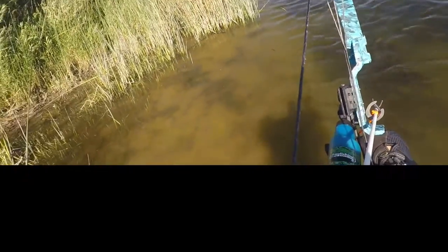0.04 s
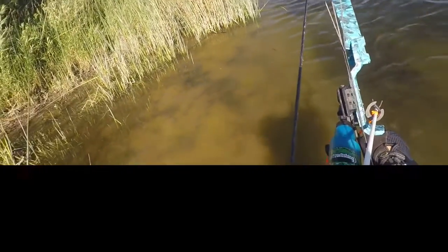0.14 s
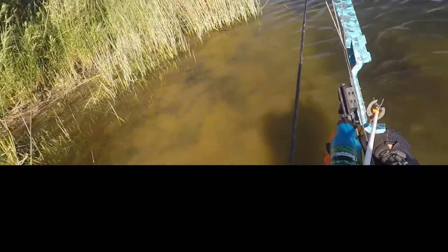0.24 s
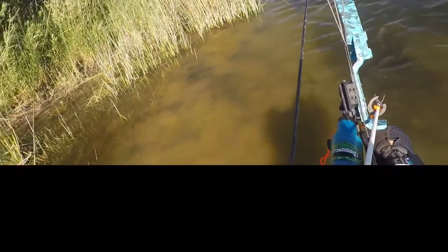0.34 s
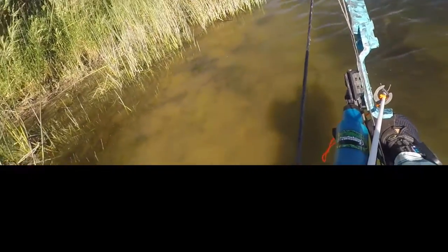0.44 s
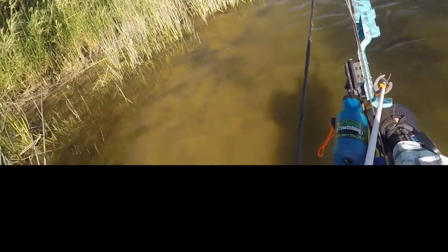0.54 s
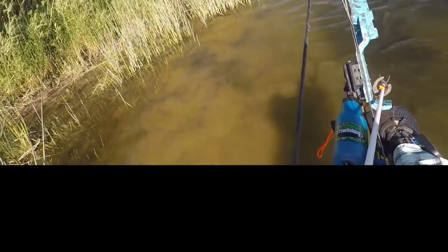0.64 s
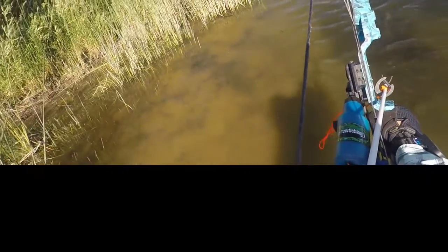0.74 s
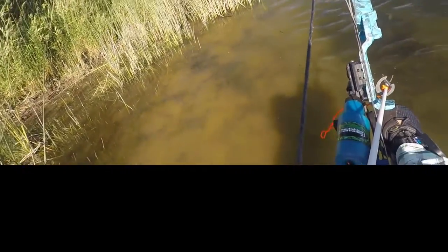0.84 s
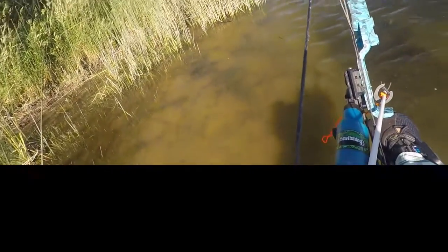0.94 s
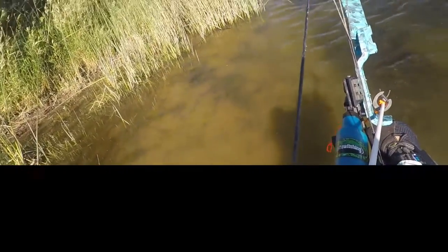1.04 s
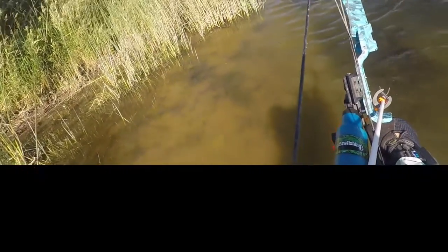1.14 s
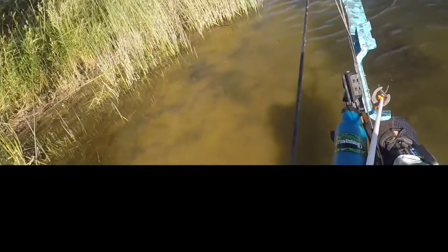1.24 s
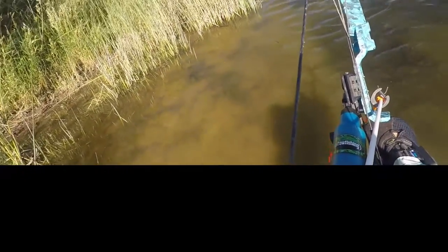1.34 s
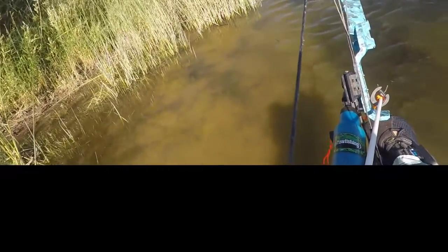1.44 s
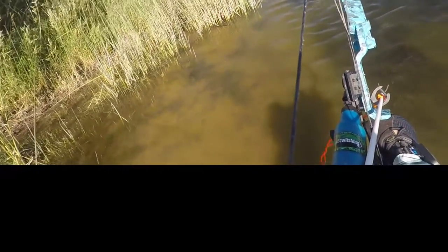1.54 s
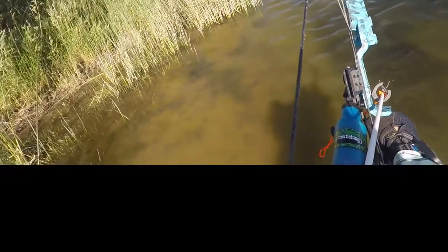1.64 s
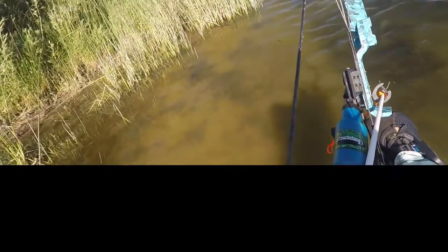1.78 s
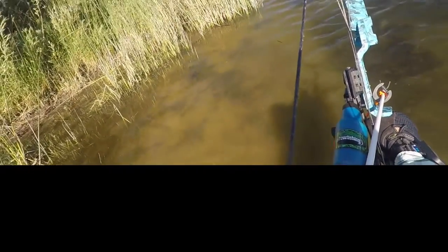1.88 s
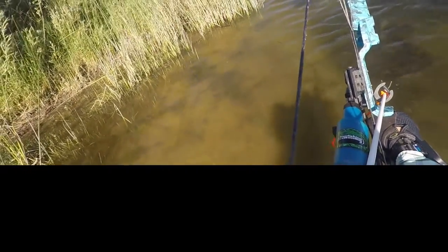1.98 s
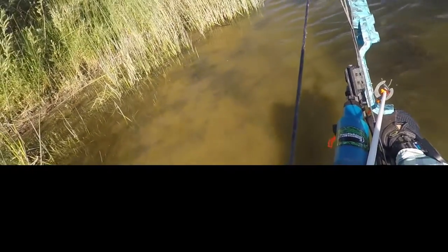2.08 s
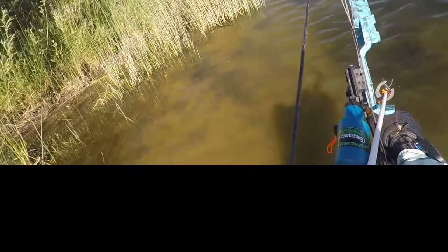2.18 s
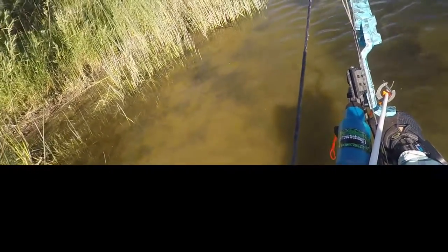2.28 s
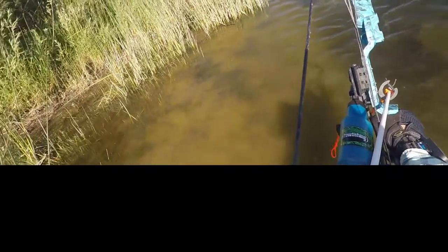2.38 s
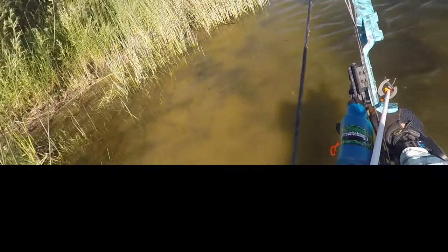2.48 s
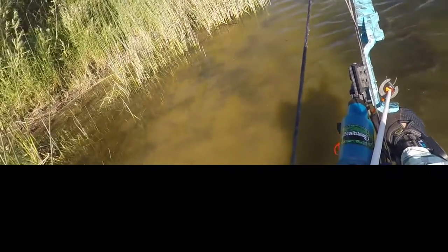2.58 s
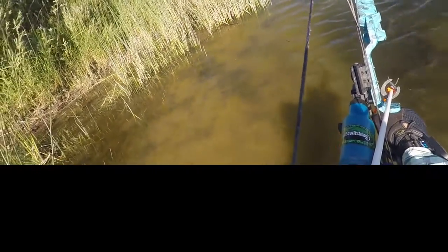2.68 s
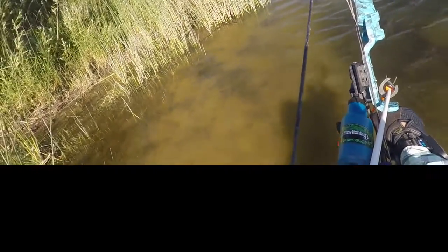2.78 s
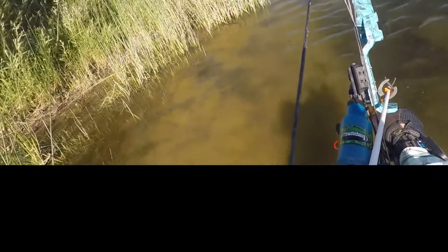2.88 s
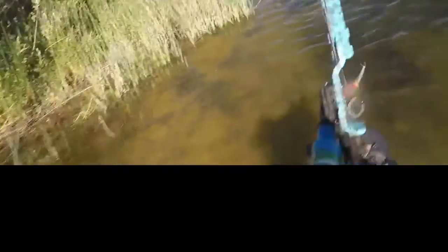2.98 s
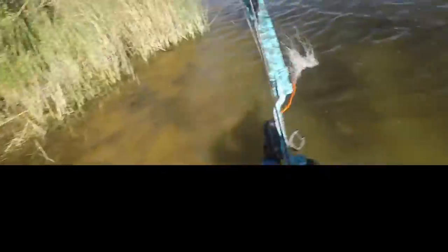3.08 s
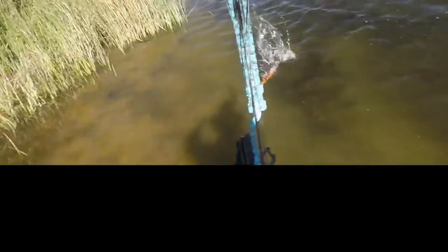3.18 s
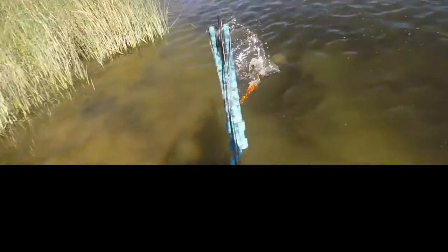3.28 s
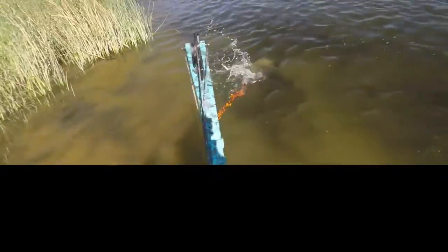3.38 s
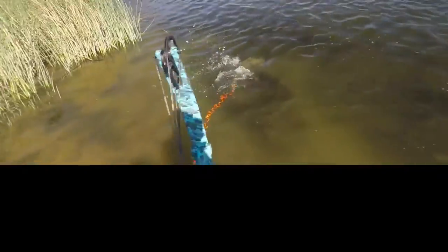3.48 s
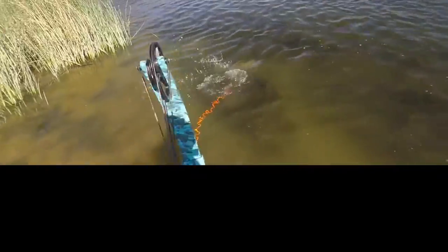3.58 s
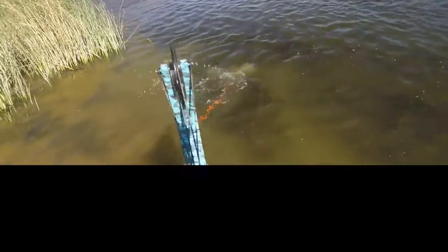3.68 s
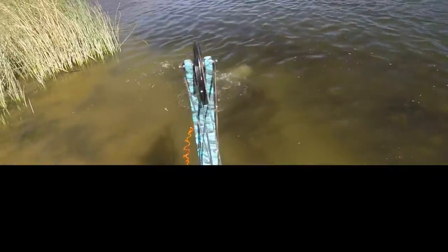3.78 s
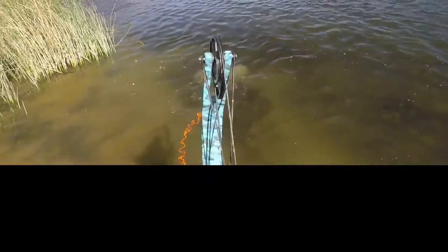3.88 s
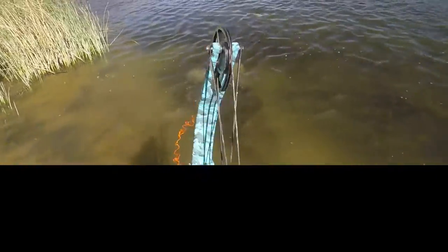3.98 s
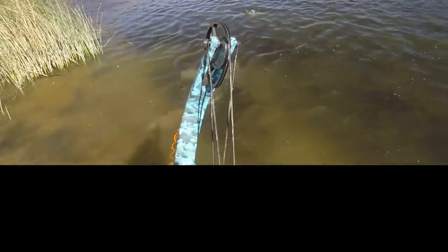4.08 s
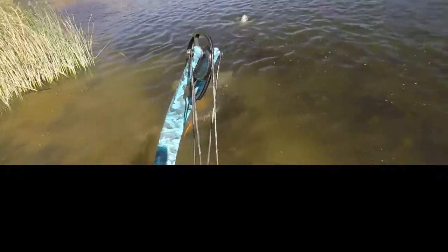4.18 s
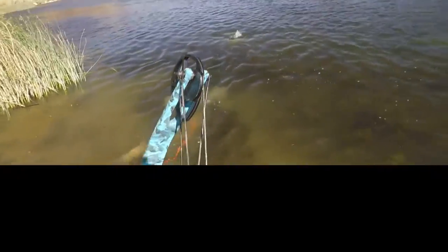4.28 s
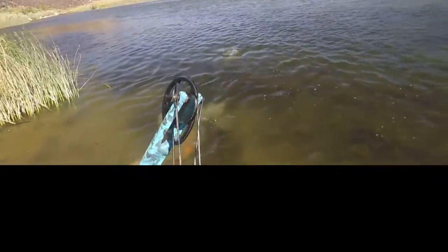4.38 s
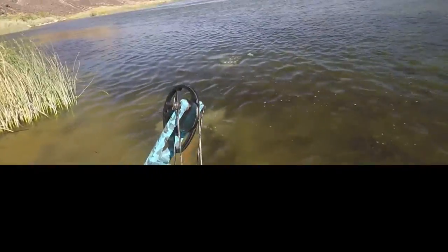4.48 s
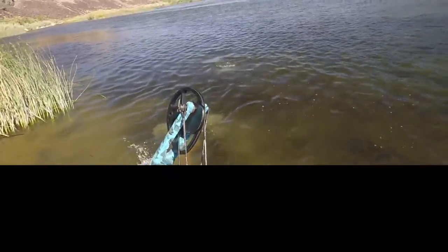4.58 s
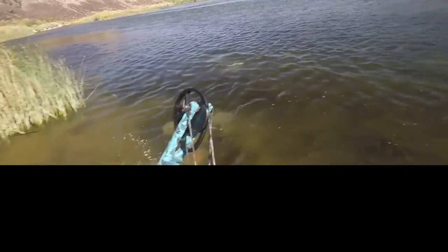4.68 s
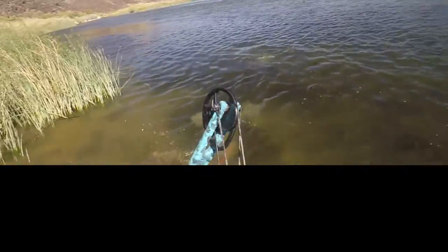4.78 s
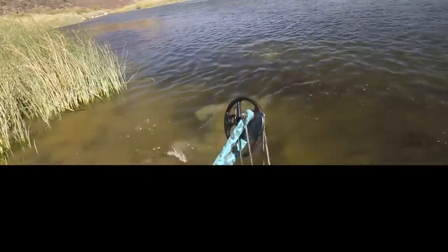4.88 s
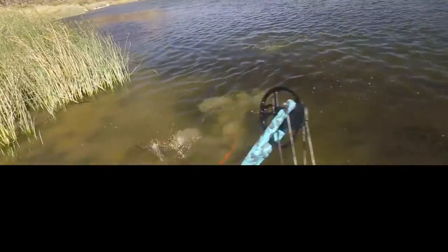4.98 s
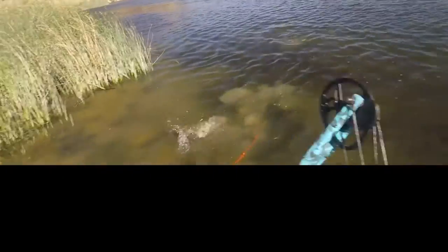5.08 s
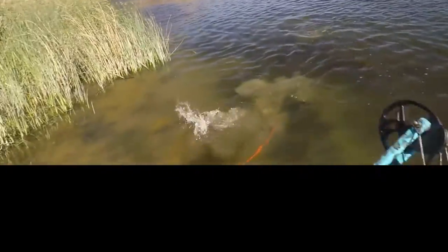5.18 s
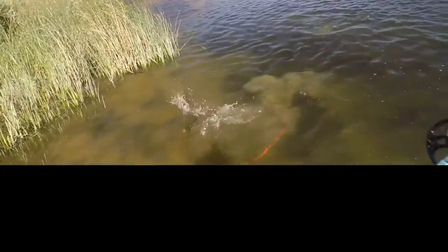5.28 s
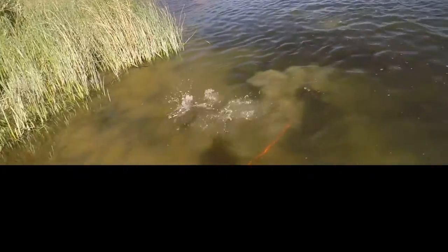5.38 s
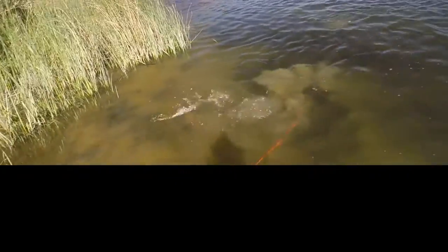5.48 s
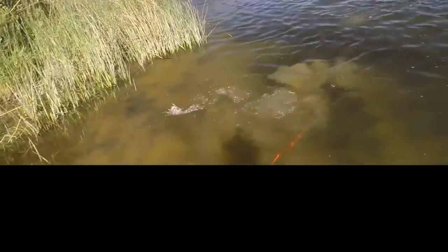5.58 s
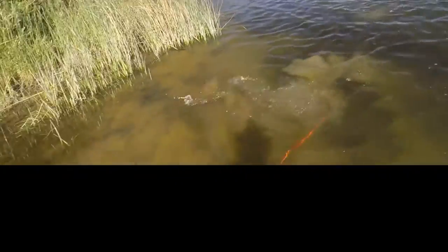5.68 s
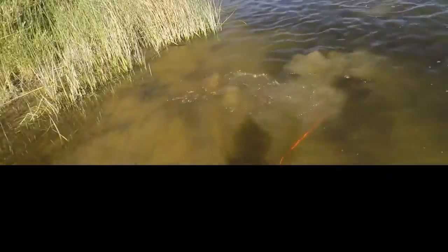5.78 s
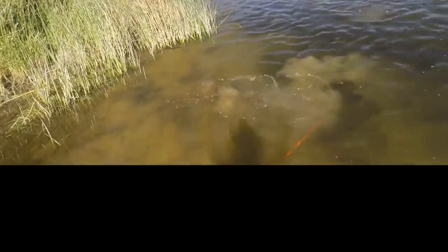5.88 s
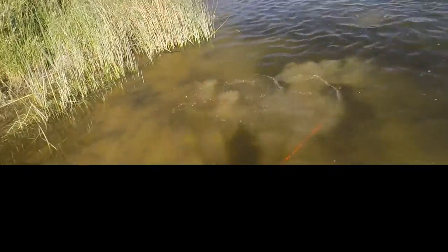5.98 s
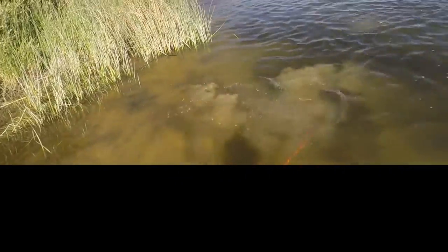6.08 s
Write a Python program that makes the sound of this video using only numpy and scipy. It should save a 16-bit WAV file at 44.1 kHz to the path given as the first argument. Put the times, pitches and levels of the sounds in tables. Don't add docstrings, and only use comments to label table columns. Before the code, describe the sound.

Outdoors at a reedy bank, wind thumps a small cased microphone in a steady low rumble over faint water rustle. Light bow ticks and a few drips come first, then a bird pipes, buzzes and trills. Midway the bow is released with a loud clattering crack and deep thud, the arrow splashes, drops patter, and later a fish thrashes in the shallows.

```python
import sys
import numpy as np
from scipy import signal
from scipy.fft import rfft, irfft
from scipy.io import wavfile
from scipy.ndimage import uniform_filter1d

SR = 44100
rng = np.random.default_rng(int(sys.argv[2]) if len(sys.argv) > 2 else 0)


def put_to_file(sound):
    columns = np.atleast_2d(sound).T
    safe = np.clip(columns, -1, 1)
    whole_steps = np.round(safe * 32767)
    wavfile.write(sys.argv[1], SR, whole_steps.astype(np.int16))


def ratio_of_db(decibels):
    return 10 ** (np.asarray(decibels, float) / 20)


N = 270814


def rms_one(x):
    return x / np.sqrt(np.mean(x ** 2) + 1e-20)


def in_time(rows, rest=None):
    s, *columns = np.transpose(rows)
    return [np.interp(np.arange(N) / SR, s, c, rest, rest) for c in columns]


def colour(x, points):
    hz, level_db = np.transpose(points)
    grid = np.maximum(np.fft.rfftfreq(len(x), 1 / SR), 1)
    return irfft(rfft(x) * ratio_of_db(np.interp(np.log(grid), np.log(hz), level_db)), len(x))


def band(x, low_hz, high_hz):
    return signal.sosfilt(signal.butter(2, [low_hz, min(high_hz, .45 * SR)], "band", fs=SR, output="sos"), x)


def drift(rate_hz):
    lowpass = signal.butter(2, rate_hz, fs=SR, output="sos")
    return rms_one(signal.sosfilt(lowpass, rng.standard_normal(N + SR))[SR:])


def grains(per_s, spread_db):
    sizes = ratio_of_db(spread_db * np.minimum(rng.exponential(1, N), 4)) * rng.choice([-1, 1], N)
    return sizes * (rng.random(N) < per_s / SR)


def add(out, s, x):
    at = round(s * SR)
    out[at:at + len(x)] += x[:N - at]


def hump(s, peak_db, rise_s, fall_s):
    t = np.arange(N) / SR - s
    return ratio_of_db(peak_db - 20 * np.where(t < 0, -t / rise_s, t / fall_s))


def glide(length, start_hz, end_hz):
    t = np.arange(round(length * SR)) / SR
    wobble = 1 + 0.004 * np.sin(2 * np.pi * (45 * t + rng.random()))
    hz = np.linspace(start_hz, end_hz, len(t)) * wobble
    return np.sin(2 * np.pi * np.cumsum(hz) / SR), t


def hits(rows, cycles, crack_s, thud_s, thud_share, top_hz=12100):
    out, t = np.zeros(N), np.arange(SR // 20) / SR
    for s, peak_db, hz, highs_db in rows:
        noise = rng.standard_normal(len(t))
        ring = np.sin(2 * np.pi * hz * t * (1 + 3 * t)) * np.exp(-hz * t / cycles)
        thud = thud_share * band(noise * np.exp(-t / thud_s), 0.66 * hz, 1.44 * hz)
        crack_low_hz = min(max(0.66 * hz, 2200), 5000)
        crack = band(noise * np.exp(-t / crack_s), crack_low_hz, max(top_hz, 1.5 * hz))
        add(out, s, ratio_of_db(peak_db - 10) * (ring + thud + ratio_of_db(highs_db + 3) * crack))
    return out


def plinks(rows):
    return ratio_of_db(-2) * hits(rows, cycles=6.0, crack_s=.002, thud_s=.004, thud_share=.8)


def paired(rows, partner_hz, crack_db, partner_crack_db):
    out = []
    for s, peak_db, hz, rel_db in rows:
        out.append((s, peak_db, hz, crack_db))
        out.append((s, peak_db + rel_db, partner_hz, partner_crack_db))
    return out


# [f/Hz, width/Hz, level/dB]
CASE_MODES = [(940, 90, 6), (1490, 160, 3), (1850, 120, 2), (2200, 260, 6), (3550, 160, 4), (4150, 250, 5),
              (5450, 300, 10), (6600, 350, 6), (7500, 350, 6), (9300, 450, 6), (12200, 500, 5)]


def case(x):
    out = x
    for hz, width_hz, level_db in CASE_MODES:
        r = np.exp(-np.pi * width_hz / SR)
        zeros = (1 - r * r) / 2 * np.array([1, 0, -1])
        poles = [1, -2 * r * np.cos(2 * np.pi * hz / SR), r * r]
        out = out + ratio_of_db(level_db - 5) * signal.lfilter(zeros, poles, x)
    return out


# [f/Hz, level/dB per Hz]
SELF_NOISE_COLOUR = [(1000, -4), (3000, 2), (8000, -6), (12000, -7.5), (15600, -8.5)]


def microphone_hiss():
    return ratio_of_db(-67.5) * rms_one(colour(rng.standard_normal(N), SELF_NOISE_COLOUR))


# [f/Hz, level/dB per Hz]
BANK_COLOUR = [(200, -5.5), (500, -10.5), (1000, -13.5), (2300, -18), (3000, -30), (6000, -31), (9000, -59),
               (15600, -42)]
# [peak t/s, level/dB, rise/s, fall/s per 20 dB]
PLUNGE_SWELL = (3, -57, 0.02, 0.16)


def bank():
    air = rng.standard_normal(N) * ratio_of_db(.6 * drift(6))
    air = air + .4 * rms_one(grains(400, spread_db=5.5))
    fading = ratio_of_db(-60 - 0.52 * np.arange(N) / SR)
    return ratio_of_db(-2.0) * (fading + hump(*PLUNGE_SWELL)) * rms_one(colour(air, BANK_COLOUR))


# [t/s, level/dB]
GUSTS = [(0.0, -35), (0.13, -36), (0.33, -39.5), (0.66, -36.5), (1.15, -36.5), (1.4, -40), (1.8, -36),
         (2.2, -38.5), (2.5, -39), (2.95, -37.5), (3.3, -33.5), (3.6, -42.5), (3.9, -36.5), (4.15, -42.5),
         (4.8, -38.5), (5.2, -39), (5.6, -42), (6.14, -40)]
# [t/s, depth/dB]
GUST_LULLS = [(0.85, 10), (1.02, 7), (1.25, 1.5), (1.47, 5), (1.58, 3.5), (1.9, 5), (2.18, 8), (2.4, 3),
              (2.85, 5), (3.81, 8), (4.069, 7), (4.49, 6), (4.66, 6.5), (5.12, 7), (5.62, 12), (5.93, 9.5)]
# [f/Hz, level/dB per Hz]
FLUTTER_COLOUR = [(26, -33), (45, -12), (100, -14), (160, -14.5), (240, -18.5), (317, -36), (600, -40),
                  (1320, -120)]
# [low f/Hz, high f/Hz, level/dB, share of the gusts' swing, loss in shelter/dB]
FLUTTER_LAYERS = [
    (46, 100, -53.5, 0.22, 2.0),
    (135, 530, -61.8, .3, 4.5),
]


def wind():
    t, gust_db = np.arange(N) / SR, in_time(GUSTS)[0]
    rumble = band(band(rng.standard_normal(N + SR), 14.4, 36.5), 20.2, 44.0)[SR:]
    swell = np.sqrt(uniform_filter1d(rumble ** 2, size=SR // 12))
    evened = rms_one(rumble / swell ** .75)
    lull_half_s = 2 * 0.039
    lull_db = sum(depth_db * np.maximum(1 - np.abs(t - s) / lull_half_s, 0) for s, depth_db in GUST_LULLS)
    out = ratio_of_db(gust_db - lull_db) * evened
    lumps = drift(45)
    flutter = colour(rng.standard_normal(N), FLUTTER_COLOUR)
    sheltered = np.clip(2 * (t - 3.1) + .5, 0, 1)
    for low_hz, high_hz, mean_db, share, shelter_db in FLUTTER_LAYERS:
        level_db = mean_db + share * (gust_db - gust_db.mean()) - shelter_db * sheltered
        lumpy_db = level_db + 1.5 + 1.1 * lumps + 1.8 * drift(39.4)
        out = out + ratio_of_db(lumpy_db) * rms_one(band(flutter, low_hz, high_hz))
    return out


def sway():
    slow = band(rng.standard_normal(N + SR), 7, 22)[SR:]
    return ratio_of_db(in_time(GUSTS)[0] - 4) * rms_one(slow)


# [start t/s, length/s, centre f/Hz, level/dB]
NOISE_PUFFS = [(0.0, 0.13, 740, -62), (0.8, 0.045, 95, -45), (0.79, 0.057, 160, -58),
               (0.792, 0.061, 890, -67), (2.3, 0.15, 900, -64.5), (2.974, 0.013, 776, -53.5),
               (3.296, 0.088, 1350, -63), (3.78, 0.045, 1600, -74), (4.532, 0.039, 3550, -62.5),
               (5.24, 0.055, 1010, -65.5), (3.06, 0.078, 2100, -47.5), (5.518, .062, 2900, -62),
               (.5, .16, 1900, -69)]


def rustles():
    out, grit = np.zeros(N), rms_one(grains(1500, spread_db=4))
    for start, length, hz, level_db in NOISE_PUFFS:
        piece = band(grit[:round(length * SR)], 0.64 * hz, 1.45 * hz)
        grit = np.roll(grit, SR // 5)
        swell = np.sin(np.linspace(.2, np.pi, len(piece))) ** 0.64
        add(out, start, ratio_of_db(level_db) * rms_one(piece) * swell)
    return out


# [t/s, peak level/dB, f/Hz, riser's ping level/dB against it]
BOW_TICKS = [
    (0.0594, -49, 835, -20),
    (0.1197, -49, 900, 5),
    (0.5294, -51, 920, 3),
    (0.602, -35, 1190, -18),
    (0.6454, -47, 970, 3),
    (0.8041, -45, 800, -22),
    (1.041, -35.5, 1325, -9),
    (1.341, -46, 1390, -19),
    (2.377, -44, 980, -15),
    (2.9746, -54, 970, -10),
]


def bow_ticks():
    return plinks(paired(BOW_TICKS, 2260, -18, -18))


# [t/s, peak level/dB]
STRING_SNAPS = [
    (.086, -53),
    (.12, -51),
    (.165, -54),
    (.485, -54),
    (.53, -49),
    (.602, -47),
    (.648, -48),
]


def snaps():
    rows = [(*row, 3100, -9) for row in STRING_SNAPS]
    return ratio_of_db(-0.6) * hits(rows, cycles=4.0, crack_s=.002, thud_s=.003, thud_share=.9, top_hz=4700)


# [t/s, peak level/dB, f/Hz]
BRIGHT_FLICKS = [(3.1737, -41, 6540), (3.1847, -40, 6470), (3.2131, -42, 5630), (3.2989, -41, 5420),
                 (3.3249, -40, 5500), (3.336, -41, 7200), (3.394, -44, 7300), (3.4431, -44, 6600),
                 (3.462, -45, 5500), (3.488, -44, 6400), (3.5299, -42, 5670), (4.372, -48, 7000),
                 (4.8856, -44, 5390), (5.131, -45, 9000), (5.194, -44, 8500), (5.2368, -42, 7500),
                 (5.2982, -40, 5500), (5.312, -36, 4300), (5.324, -38, 2100), (5.173, -39, 2840),
                 (5.121, -43, 2200), (5.5566, -40, 3600), (5.545, -42, 4200), (5.575, -41, 2900),
                 (5.6728, -43, 3560), (6.12, -44, 4600), (.657, -46, 5000), (.26, -47, 3000),
                 (1.0415, -33, 1750)]


def flicks():
    rows = [(*row, -13) for row in BRIGHT_FLICKS]
    return ratio_of_db(-7) * hits(rows, cycles=7.0, crack_s=.0015, thud_s=.003, thud_share=.7)


# [peak t/s, level/dB, rise/s, fall/s per 20 dB]
REED_TRICKLES = [
    (1.8, -78, .6, .6),
    (4.15, -75, .5, .6),
    (4.7, -79, .5, .4),
    (5.03, -76, .3, .2),
]


def trickle():
    gurgle = band(rng.standard_normal(N), 1400, 1680) * ratio_of_db(3.0 * drift(12))
    return sum(hump(*row) for row in REED_TRICKLES) * rms_one(gurgle)


# [t/s, peak level/dB]
FAR_DRIPS = [
    (1.3493, -44),
    (1.5838, -41),
    (1.7702, -38),
]


def drips():
    return plinks([(*row, 2960, -30) for row in FAR_DRIPS])


# [start t/s, length/s, start f/Hz, end f/Hz, peak level/dB]
CLEAR_NOTES = [
    (1.898, .006, 6800, 5370, -56.5),
    (1.95, 0.05, 3460, 3800, -61),
    (2.376, 0.0063, 4550, 3750, -61),
    (2.52, 0.031, 5740, 5710, -58),
    (2.523, .099, 8700, 8700, -70),
    (2.525, .095, 13000, 13150, -78),
    (2.556, .015, 3715, 4030, -51),
    (2.559, 0.038, 3986, 3890, -47),
    (2.772, .048, 7700, 7680, -62.5),
]
# [start t/s, length/s, start f/Hz, end f/Hz, peak level/dB]
BURRED_NOTES = [
    (2.45, .042, 7450, 7450, -63),
    (2.586, .019, 3870, 3680, -60),
    (2.587, .064, 4330, 4420, -58),
    (2.592, .054, 3620, 3880, -56),
    (2.806, .062, 7620, 7520, -63),
]


def pipes():
    out = np.zeros(N)
    for rows, burr in [(CLEAR_NOTES, .08), (BURRED_NOTES, .87)]:
        for start, length, start_hz, end_hz, peak_db in rows:
            tone, t = glide(length, start_hz, end_hz)
            swell = np.sin(np.pi * (t / t[-1]) ** 0.7) ** 0.67
            fade = ratio_of_db(-burr * 130 * t)
            pulsing = 1 - burr * np.abs(np.cos(np.pi * 108 * t)) ** .6
            add(out, start, ratio_of_db(peak_db) * tone * swell * fade * pulsing)
    return out


# [t/s, carrier f/Hz, level/dB, pulse f/Hz]
BUZZ_CURVE = [
    (1.945, 4100, -68, 183),
    (1.969, 3954, -53, 160),
    (2.035, 3950, -49.5, 259),
    (2.097, 3962, -53, 340),
    (2.241, 4003, -56, 320),
    (2.287, 3954, -51.5, 320),
    (2.309, 3930, -63, 270),
    (2.32, 4030, -77, 343),
]


def buzz():
    hz, level_db, per_s = in_time(BUZZ_CURVE, rest=-130)
    hz, _, per_s = in_time(BUZZ_CURVE)
    hz, per_s = hz + 7 * drift(50), per_s + 9 * drift(50)
    carrier, beat = 2 * np.pi * np.cumsum(hz) / SR, 2 * np.pi * np.cumsum(per_s) / SR
    lines = np.sin(carrier) + 0.41 * np.sin(carrier - beat)
    lines = lines + 0.12 * np.sin(carrier + beat) + 0.034 * np.sin(carrier - 2 * beat)
    return ratio_of_db(level_db + 0.5) * lines


# [t/s, start f/Hz, end f/Hz, peak level/dB]
STUTTER_CHIPS = [
    (2.589, 4750, 4050, -50),
    (2.598, 4600, 3950, -51),
    (2.609, 4600, 4100, -53),
    (2.618, 4600, 4000, -54),
    (2.629, 4700, 4150, -56),
    (2.64, 4700, 4200, -58),
]


def stutter():
    out = np.zeros(N)
    for s, start_hz, end_hz, peak_db in STUTTER_CHIPS:
        tone, t = glide(.008, start_hz, end_hz)
        add(out, s, ratio_of_db(peak_db) * tone * np.sin(np.pi * t / t[-1]))
    return out


# [t/s, peak level/dB]
TRILL_BEATS = [(2.8799, -51), (2.926, -52), (2.9725, -50.5), (3.1607, -60), (3.207, -53), (3.2535, -54.5),
               (3.3004, -52), (3.3494, -57), (3.393, -55), (3.443, -50), (3.485, -53.5), (3.54, -54),
               (3.585, -58)]


def trill():
    # [lag/s, length/s, start f/Hz, end f/Hz, level/dB]
    chips = [(-.002, 0.0091, 3780, 4300, -2.5), (.0, 0.0077, 3000, 2830, -8.5), (.008, 0.0066, 3740, 3450, -7)]
    out = np.zeros(N)
    for s, peak_db in TRILL_BEATS:
        for lag, length, start_hz, end_hz, chip_db in chips:
            tone, t = glide(length, start_hz, end_hz)
            add(out, s + lag, ratio_of_db(peak_db + chip_db) * tone * np.sin(np.pi * t / t[-1]))
    return out


def bird():
    song = pipes() + buzz() + trill()
    echo = sum(np.roll(song, round(lag * SR)) for lag in (.004, .009, .017, .026))
    return song + ratio_of_db(-17) * echo + stutter()


# [t/s, level/dB]
RATTLE_CURVE = [
    (2.995, -57),
    (3.014, -42),
    (3.018, -33),
    (3.027, -27),
    (3.044, -27),
    (3.053, -25),
    (3.073, -37.5),
    (3.105, -39.5),
    (3.141, -48.5),
    (3.29, -67),
]
# [f/Hz, level/dB per Hz]
RATTLE_COLOUR = [(530, -34), (900, -16), (2300, -6), (3000, -11.5), (6700, -13.5), (8000, -24.5),
                 (12000, -24), (15000, -23)]


def rattle():
    level_db = in_time(RATTLE_CURVE, rest=-130)[0]
    contacts = grains(14000, spread_db=2) * ratio_of_db(1.5 * drift(150))
    rush_db = -41 + 1.6 * (level_db + 28)
    rush = band(rng.standard_normal(N), 330, 850)
    return ratio_of_db(level_db - 9.0) * rms_one(colour(contacts, RATTLE_COLOUR)) + ratio_of_db(rush_db) * rms_one(rush)


# [t/s, level/dB]
JOLT_CURVE = [
    (2.996, -46),
    (3.008, -28),
    (3.02, -21),
    (3.035, -17.5),
    (3.059, -19),
    (3.095, -29),
    (3.2, -40),
]
# [t/s, f/Hz, peak level/dB, t60/s]
LIMB_THUDS = [
    (3.022, 195, -25.5, 0.079),
    (3.026, 680, -39, 0.097),
    (3.034, 91, -22.5, 0.15),
    (3.036, 223, -30, 0.057),
    (3.048, 720, -29, 0.035),
    (3.05, 72, -25, 0.16),
    (3.272, 26, -22, 0.2),
]


def jolt():
    t = np.arange(N) / SR - 3.040
    swell = uniform_filter1d(ratio_of_db(in_time(JOLT_CURVE, rest=-130)[0] + 4.5), size=SR // 100)
    out = -swell * np.cos(2 * np.pi * 32.5 * t)
    t = np.arange(SR // 3) / SR
    for s, hz, peak_db, t60 in LIMB_THUDS:
        onset = 1 - np.exp(-t / 0.0022)
        add(out, s, -ratio_of_db(peak_db - 60 * t / t60) * np.sin(2 * np.pi * hz * t) * onset)
    return out


# [t/s, peak level/dB, f/Hz, highs level/dB against it]
RELEASE_KNOCKS = [(3.0047, -25, 5700, -18), (3.0163, -22, 6500, -7), (3.0207, -25, 940, -16),
                  (3.0262, -20, 480, -30), (3.0268, -15, 5350, -13), (3.0325, -14, 1760, -10),
                  (3.0378, -9.5, 1990, -9), (3.0403, -11, 2100, -9), (3.0497, -5.5, 2300, -16),
                  (3.0497, -17, 1400, -30), (3.0608, -19, 2560, -8), (3.0655, -19.5, 1970, -11),
                  (3.1028, -28, 6500, -8), (3.1075, -19, 2300, -6)]


def knocks():
    return ratio_of_db(-3) * hits(RELEASE_KNOCKS, cycles=3.8, crack_s=.002, thud_s=.002, thud_share=.4)


# [t/s, peak level/dB, f/Hz, highs level/dB against it]
LATE_KNOCKS = [(3.0205, -22, 1500, -25), (3.058, -28, 800, -30), (3.066, -28, 700, -30),
               (3.083, -30, 700, -30), (3.08, -25, 2000, -20), (3.089, -27, 2300, -20),
               (3.094, -30, 1100, -8), (3.121, -30, 1560, -20), (3.128, -31, 1600, -20),
               (3.13, -41, 850, -20), (3.139, -34, 2250, -15), (3.17, -40, 950, -20)]


def afterknocks():
    return ratio_of_db(-6) * hits(LATE_KNOCKS, cycles=5.0, crack_s=.002, thud_s=.003, thud_share=.4)


# [peak t/s, body level/dB, rise/s, fall/s per 20 dB, spray level/dB against the body]
SPLASHES = [
    (3.15, -59.5, 0.036, 0.54, -9),
    (3.55, -69.5, .6, 0.2, 3.5),
    (4.9, -72, 1.8, 1, -3.5),
    (5.26, -60, .5, .45, -4.5),
    (5.39, -68.5, 0.35, 0.36, -0.5),
    (5.56, -62, .1, 0.07, -8),
    (5.63, -69, .05, 1.5, -3),
]
# [f/Hz, level/dB per Hz]
SPRAY_COLOUR = [(350, -33), (700, -12.5), (2200, -9), (4200, 0), (6000, -14.5), (9000, -22.5),
                (15600, -26.5)]


def splashes():
    born = grains(3500 * ratio_of_db(2.2 * drift(40)), spread_db=2.6)
    pitches, dealt = np.geomspace(800, 13000, 20), rng.integers(0, 20, N)
    fizz = 0.27 * born
    for k, hz in enumerate(pitches):
        r, w = np.exp(-hz / 4.6 / SR), 2 * np.pi * hz / SR
        bubbles = born * (dealt == k) + 1e-18
        fizz = fizz + signal.lfilter([0, np.sin(w) * hz / 9000], [1, -2 * r * np.cos(w), r * r], bubbles)
    fizz = colour(rms_one(fizz) + .5 * rng.standard_normal(N), SPRAY_COLOUR)
    body = sum(hump(*row[:4]) for row in SPLASHES)
    spray = sum(hump(*row[:4]) * ratio_of_db(row[4]) for row in SPLASHES)
    low_wash = ratio_of_db(-2.4) * body * rms_one(band(fizz, 1120, 2980))
    return low_wash + ratio_of_db(-.3) * spray * rms_one(band(fizz, 4080, 15400))


# [t/s, peak level/dB, f/Hz, spit level/dB against it]
FALLING_DROPS = [(3.1294, -41, 2200, -15), (3.1744, -43, 1400, -10), (3.1822, -42, 2020, -12),
                 (3.2144, -39, 1810, -8), (3.2935, -45, 1390, -7), (3.3094, -40, 1360, -10),
                 (3.3564, -45, 960, -8), (3.3644, -40, 1490, -6), (3.4525, -41, 1320, -10),
                 (3.4901, -43.5, 2180, -4), (3.5345, -51, 950, 3), (3.6806, -53, 1470, -8),
                 (3.957, -42, 1410, -18), (4.0433, -42.5, 2200, -2.5), (4.1645, -49, 1500, -16),
                 (4.2014, -46, 1480, -21)]
# [t/s, peak level/dB, f/Hz, spit level/dB against it]
FISH_SLAPS = [(4.533, -47, 2950, 6), (4.9547, -41.5, 1400, -10), (5.0077, -44, 1540, 2),
              (5.1538, -45, 2840, -9), (5.1733, -54, 925, 9), (5.2092, -49.5, 1990, -3),
              (5.251, -43, 2190, -8), (5.299, -36, 2000, 4), (5.38, -45, 2230, 10.5), (5.44, -48, 1860, 5),
              (5.5244, -55, 2000, -3.5), (5.5323, -44, 2030, -6), (5.5569, -46, 2900, -1),
              (5.5744, -45, 2180, -8), (5.699, -53, 2200, -5.5), (5.8472, -57, 2100, -10),
              (5.8881, -46, 2200, -4)]
# [t/s, peak level/dB, f/Hz]
FINE_SPITS = [(3.3266, -37, 3840), (3.6946, -45, 5560), (3.7495, -45, 3620), (3.7874, -50, 5500),
              (4.3726, -43, 3750), (4.5801, -41, 4150), (4.6848, -45.5, 6500), (4.837, -42, 4260),
              (4.9248, -47, 4210), (4.9447, -43, 4240), (5.057, -40, 3600), (5.0884, -37, 3600),
              (5.1937, -45, 5530), (5.236, -38, 3800), (5.267, -52, 5320), (5.697, -46, 5450),
              (5.7754, -46.5, 5400)]


def drops():
    lone = [(*row, -16) for row in FINE_SPITS]
    return plinks(paired(FALLING_DROPS + FISH_SLAPS, 4050, -12, -16) + lone)


# [t/s, peak level/dB]
RIM_POPS = [(3.24, -55), (3.36, -51), (3.574, -54), (3.677, -55), (4.178, -49), (4.293, -53), (4.395, -51),
            (5.11, -56), (5.281, -53), (5.421, -49), (5.821, -52), (5.934, -49), (6.035, -50), (6.107, -57)]
# [t/s, peak level/dB]
EXTRA_RIM_POPS = [
    (3.464, -52),
    (5.199, -50),
    (5.32, -53),
    (5.521, -54),
    (5.575, -53),
    (3.135, -50),
]


def pops():
    out, t = np.zeros(N), np.arange(SR // 20) / SR
    for s, peak_db in RIM_POPS + EXTRA_RIM_POPS:
        puff = band(rng.standard_normal(len(t)) * np.exp(-t / 0.005), 120, 480)
        add(out, s, ratio_of_db(peak_db - 1.5) * puff / np.abs(puff).max())
    return out


def scene():
    bow = bow_ticks() + snaps() + flicks() + rattle() + knocks() + afterknocks()
    water = trickle() + drips() + splashes() + drops()
    air = case(bank() + rustles() + bow + water) + bird()
    return (air + wind() + sway() + jolt() + pops())[None]


def top_cut(x):
    return signal.sosfilt(signal.butter(12, 15700, fs=SR, output="sos"), x)


def record(dry):
    wet = dry + microphone_hiss()
    wet = signal.sosfilt(signal.cheby2(10, 50, 15900, fs=SR, output="sos"), wet)
    return top_cut(wet)


dry = scene()
out = record(dry)
put_to_file(out)
```